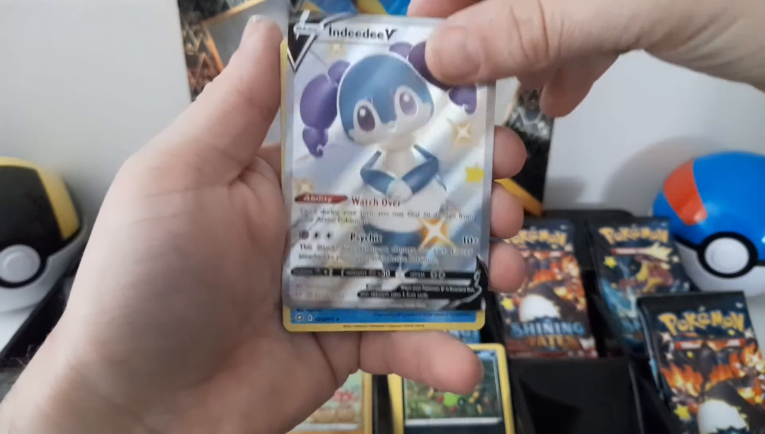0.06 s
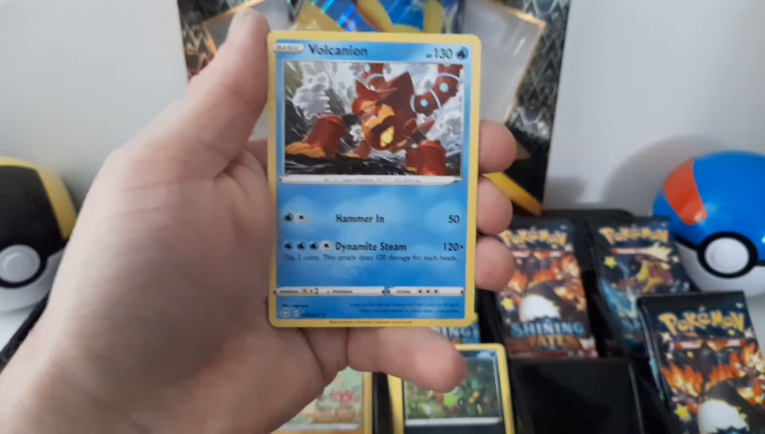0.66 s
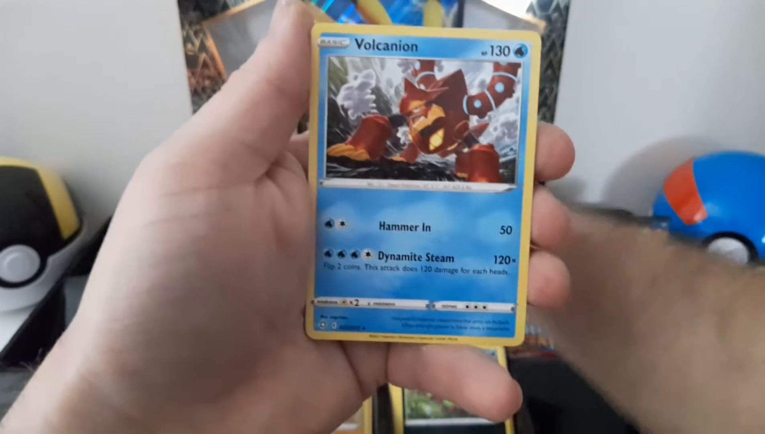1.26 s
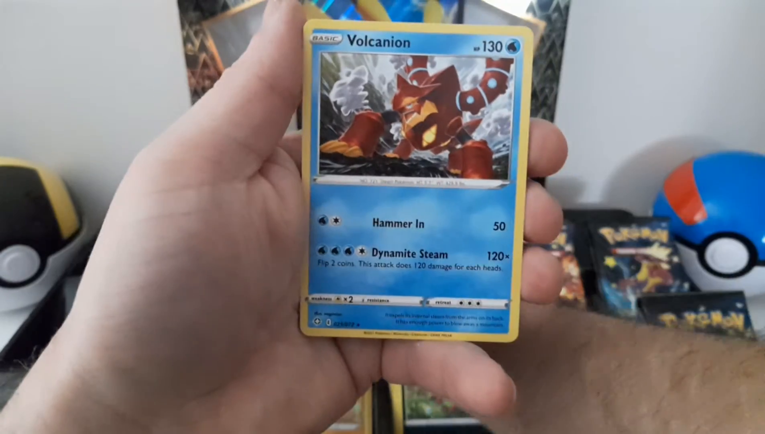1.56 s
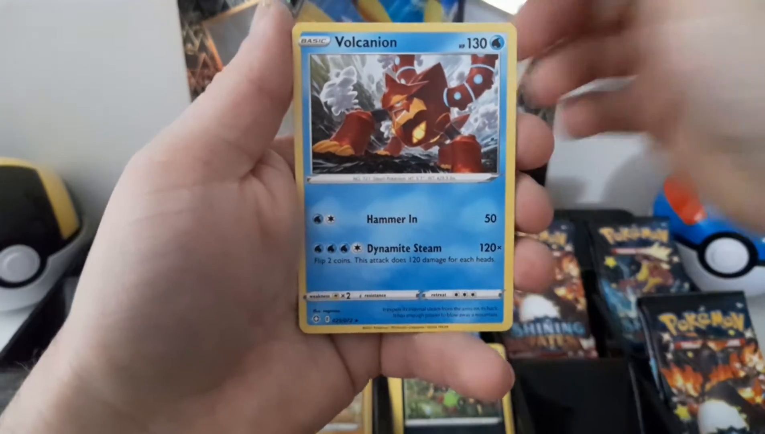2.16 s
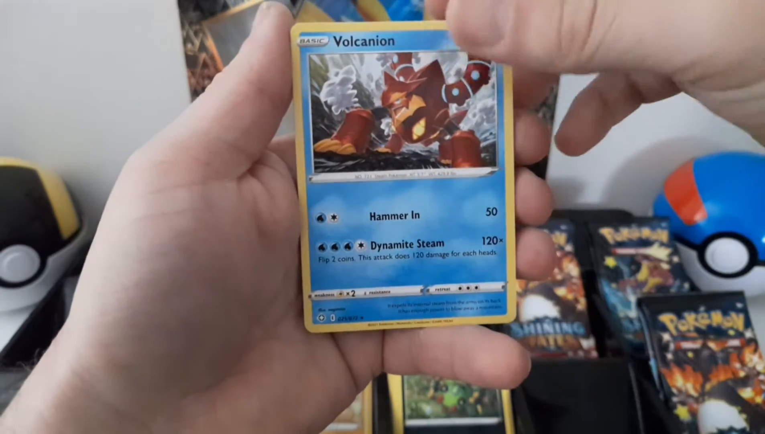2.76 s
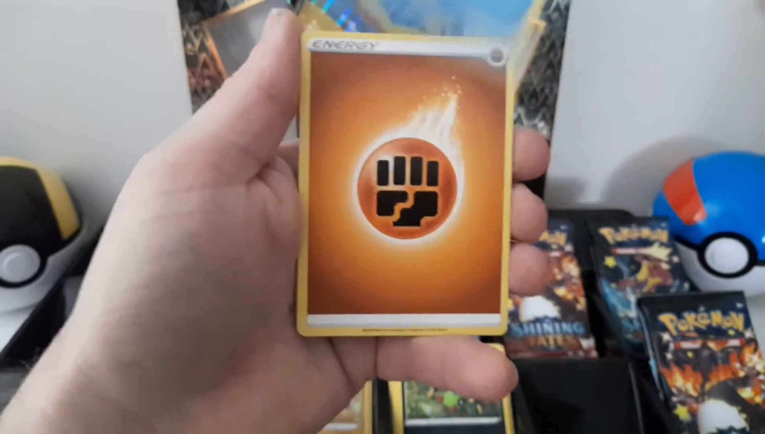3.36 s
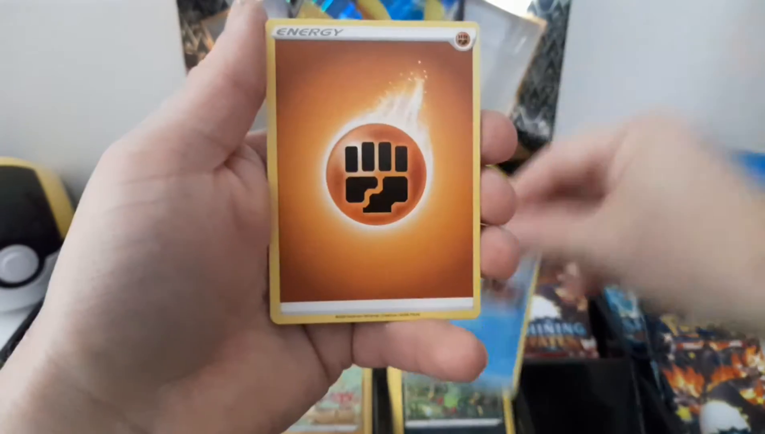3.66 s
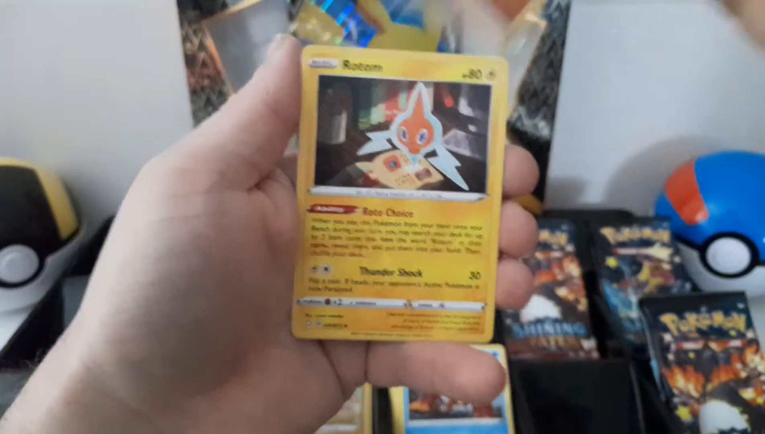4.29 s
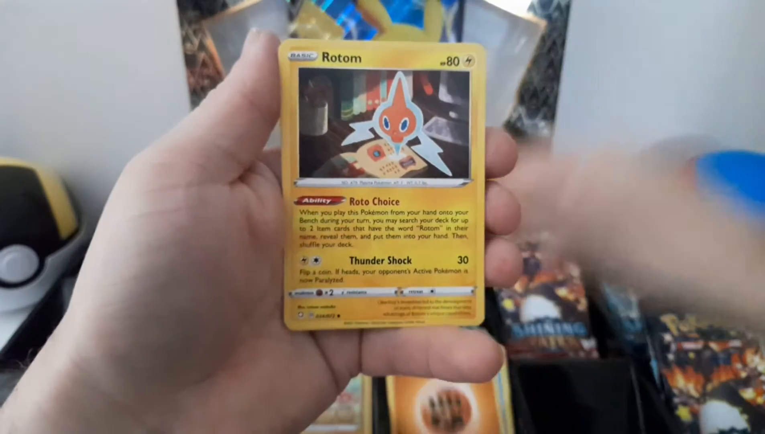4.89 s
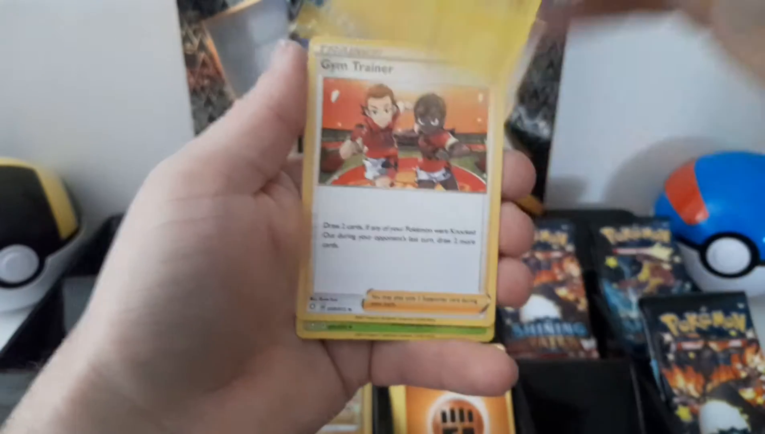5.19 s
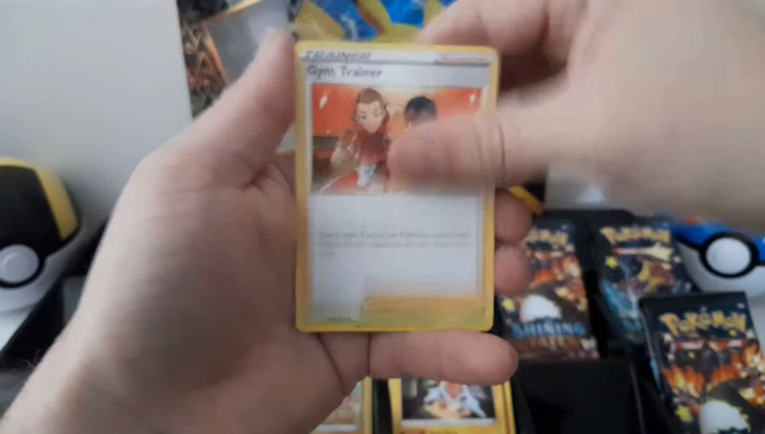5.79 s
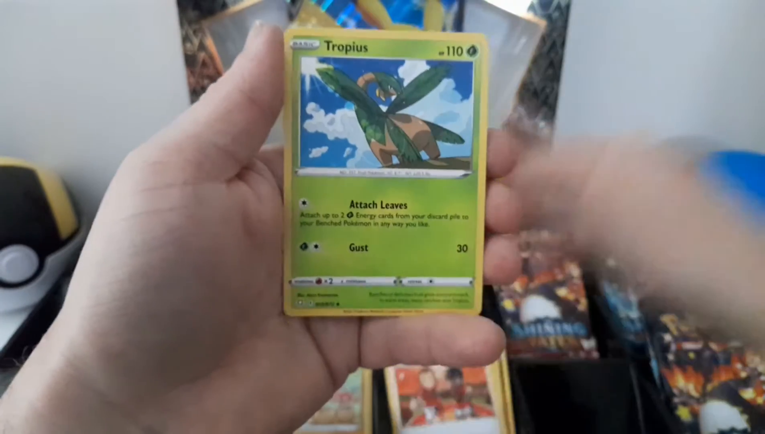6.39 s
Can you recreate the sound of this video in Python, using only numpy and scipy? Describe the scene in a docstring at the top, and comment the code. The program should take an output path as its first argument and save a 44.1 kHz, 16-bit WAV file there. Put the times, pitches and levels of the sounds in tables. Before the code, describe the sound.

Trading cards slide off a hand-held stack in short swishes and drop into a rattling plastic tray in a quiet room.

```python
"""A quiet room, close up: trading cards are slid one by one off a small hand-held stack.
Fingertips brush the stack; each card hisses over the next and its edge flicks free.
One card is laid on the table top; later ones drop on a pile in a hollow plastic tray,
which knocks and rattles. An appliance hums faintly."""
import sys
import numpy as np
from scipy import signal
from scipy.io import wavfile

SR = 44100
rng = np.random.default_rng(int(sys.argv[2]) if len(sys.argv) > 2 else 0)


def to_wav(sig):
    """Store sig (one row per channel, or 1-D mono) as 16-bit WAV at the path in sys.argv[1].

    Samples outside -1..1 are clipped; the rate is SR.
    """
    pcm = np.clip(np.atleast_2d(sig), -1, 1) * 32767
    pcm = np.round(pcm).astype(np.int16)
    wavfile.write(sys.argv[1], SR, pcm.T)  # frames by channels


N = 288678
TIME_S = np.arange(N) / SR

# Room noise spectrum. Each row: frequency in Hz, relative density in dB.
AIR_SPECTRUM = [(15, -48), (25, -45.5), (45, -9), (97, -3), (145, -8.5), (161, -13), (212, -17.5),
                (242, -16), (335, -6.5), (405, -13.5), (516, -14.5), (1260, -27), (1560, -30),
                (4370, -35.5), (16000, -37)]
# Appliance tones. Each row: frequency in Hz, level in dB.
HUM_TONES = [(134.6, -74.5), (333.8, -71.5), (371.4, -89.5), (570.6, -84)]
# Stereo likeness of noise. Each row: frequency in Hz, left-right correlation.
STEREO_CORRELATION = [(50, 0.22), (250, 0.55), (700, 0.23), (1400, 0), (3000, 0.2), (8000, 0),
                      (15000, 0.46)]
# Room echo. Each row: frequency in Hz, T60 in seconds, gain in dB.
ECHO_BANDS = [(151, 0.41, -8.5), (400, 0.23, -12.5), (990, 0.5, -20), (3000, 0.33, -15.5),
              (7000, 0.63, -20.5), (15000, 0.16, -8.5)]

# Friction spectra. Each row: frequency in Hz, relative density in dB.
RASP_SPECTRUM = [(120, 0), (300, 4), (600, -3), (1000, -0.5), (1400, -8), (2150, 3), (2900, -4),
                 (4200, -0.5), (5500, 2.5), (6800, -3.5), (8200, -13), (11000, 0), (16000, -40)]
HISS_SPECTRUM = [(3000, -25), (7000, 7.5), (9000, -18), (11500, 4.5), (14000, 8), (16000, -1.5)]
# Card-on-card strokes. Each row: start and length in seconds, then rasp, hiss and swell in dB.
STROKES = [(0.212, .26, -57, -59, 18.5), (1.711, 0.23, -68, -82, 4), (3.035, .16, -64.5, -61.5, 7.5),
           (3.223, 0.047, -65, -72, 5), (3.278, .13, -53, -52, 5), (3.829, 0.13, -65, -77, -6.5),
           (3.955, 0.017, -41.5, -45, 12), (4.003, .18, -71, -76, 0), (4.198, 0.12, -51.5, -46, 8),
           (4.634, 0.074, -42, -47.5, 18), (5.089, 0.051, -59, -58.5, -4), (5.143, 0.096, -51, -47, 5.5),
           (5.541, 0.083, -62, -58.5, -0.5), (5.83, .12, -41.5, -39, 15.5), (5.965, 0.046, -59, -82.5, 2),
           (6.04, .11, -72.5, -70.5, 1.5), (6.274, 0.043, -46.5, -52, 0.5)]

# Resonances. Each row: frequency in Hz, relative level in dB, T60 in seconds.
CARD_MODES = [(239, 4, 0.046), (312.4, 7, 0.073), (415, -27, 0.065), (580, -15, 0.01), (944, 12, 0.015),
              (1030, -14, 0.022), (1680, -2.5, 0.033), (2320, -11, 0.03)]
TABLE_MODES = [(259, 4, 0.081), (314.4, 2, 0.12), (384, -5, 0.13), (547, -13, 0.15), (619, -9.5, 0.13),
               (778, -3.5, 0.062), (963, -2.5, 0.025), (1134, -2, 0.047), (1720, -28, 0.023),
               (2240, 8.5, 0.027)]
TRAY_MODES = [(265, -9, 0.11), (303, -2.5, 0.11), (335, 0.5, 0.082), (350, -2, 0.043), (427, -1, 0.085),
              (528.3, -4.5, .1), (637, -11, 0.088), (750, -6.5, 0.055), (860, -3, 0.048),
              (1024, -0.5, 0.053), (1101, -7, 0.079), (1256, -4.5, 0.026), (1392, 3.5, 0.028),
              (1512, -4.5, 0.051), (2070, -5, 0.03), (2730, -4, 0.018), (2960, 0, .018), (3680, -1, .014),
              (5200, -5, 0.011), (6100, -7, .012)]
# Thump, body, clack and tick ranges of a contact. Each row: low and high edge in Hz.
RANGES_HZ = [(215, 600), (600, 2000), (2000, 6900), (6900, 17000)]
# Gain in dB that full hardness adds to each of those ranges.
HARDNESS_DB = (1.5, -1.5, 13.5, 17)
# Contacts. Each row: start in seconds, base level in dB, hardness from 0 to 1, extra thump in dB.
FINGER_HITS = [(2.6381, -72.5, 0.1, 1), (3.5733, -76.5, 0.74, 8), (3.8241, -63.5, 0.06, -3),
               (3.9182, -66.5, 0.9, -3), (3.9464, -58, 0.87, -1), (4.1921, -56, .4, 1),
               (4.8596, -67, 0.87, 0), (5.8182, -45.5, 0, 0), (6.2575, -63, 0.72, 5),
               (6.3701, -61.5, 1.0, -12)]
EDGE_HITS = [(3.3259, -62, 1, 7), (3.4101, -62.5, 0.1, 10.5), (4.3166, -51.5, 0.3, -4),
             (4.3318, -44, 0.63, -2), (5.2618, -39.5, 0, -2.5), (5.952, -37.5, 0.73, 4)]
TABLE_HITS = [(1.482, -58, 0.94, 3.5), (1.5112, -63, 0.6, -1), (1.6982, -52, 0.16, -4),
              (1.7779, -63, 0.6, -4), (1.854, -37, 0.73, -2), (1.9123, -45, 0.33, -4),
              (1.9381, -48.5, 0.05, 3), (1.9727, -53, 0, 0)]
TRAY_HITS = [(3.9745, -33.5, 0.84, 1.5), (4.0376, -44.5, 0.3, 4.5), (4.0659, -49, 0.1, -2),
             (4.0883, -40, 0.74, 2.5), (4.1168, -48.5, .1, 4.5), (4.1415, -45.5, .4, 1),
             (4.5646, -31.5, 1.0, -1.5), (4.6305, -46.5, 0.98, -2.5), (4.6704, -35, 0.43, -5.5),
             (4.7508, -52.5, 0.6, -15), (4.9285, -29, 0.76, 0), (4.96, -44, 0, -9), (5.0096, -41, 0, -2),
             (5.0555, -40, 0.9, 6.5), (5.0706, -40, 0.65, -0.5), (5.0827, -49.5, 0, 18.5),
             (5.11, -28, 0, -5.5), (5.6287, -27, 0.92, 1), (5.701, -36, 0.24, 0), (5.751, -43, 0.5, 2),
             (5.7824, -47, 0.17, -2), (6.3892, -30, 0.68, 2), (6.4186, -48, 0.8, -11),
             (6.4492, -49.5, 0.5, 6), (6.4981, -35, 0, -2), (6.5244, -50.5, 0.66, 3)]


def from_db(db):
    """Decibels to gain."""
    return 10 ** (np.asarray(db) / 20)


def unit_rms(x):
    """Scale to unit power."""
    return x / np.sqrt(np.mean(x ** 2) + 1e-20)


def at_hz(table, hz, column=1):
    """Interpolate a column over log frequency."""
    columns = np.transpose(table)
    return np.interp(np.log(hz), np.log(columns[0]), columns[column])


def bandpass(x, low_hz, high_hz, order=2):
    """Causal Butterworth band-pass."""
    return signal.sosfilt(signal.butter(order, [low_hz, high_hz], "band", fs=SR, output="sos"), x)


def drift(rate_hz):
    """Random ramps, unit RMS."""
    knots = rng.standard_normal(N // 10)
    return unit_rms(np.interp(TIME_S * rate_hz, np.arange(len(knots)), knots))


def add(out, start_s, sound):
    """Mix in a short stereo sound."""
    start = int(start_s * SR)
    out[:, start:start + sound.shape[1]] += sound[:, :N - start]


def pan(x, left_db):
    """Stereo balance, left minus right."""
    return x * from_db([[left_db / 2], [-left_db / 2]])


def noise_bands(size):
    """Yield centre in Hz and partly correlated stereo noise for each narrow band."""
    edges_hz = np.geomspace(25, 17500, 27)
    white = rng.standard_normal((2, 2, size))
    for k, (low_hz, high_hz) in enumerate(zip(edges_hz, edges_hz[1:])):
        mid, side = bandpass(white[k % 2], low_hz, high_hz)
        hz = np.sqrt(low_hz * high_hz)
        alike = np.clip(at_hz(STEREO_CORRELATION, hz), -1, 1)
        yield hz, np.sqrt(1 + alike) * mid + np.sqrt(1 - alike) * side * [[1], [-1]]


def coloured_noise(spectrum, waver_db):
    """Stereo noise, unit RMS; each band swells and fades on its own."""
    return unit_rms(sum(from_db(at_hz(spectrum, hz) + waver_db * drift(22)) * noise
                        for hz, noise in noise_bands(N)))


def room_air():
    """Soft, bass-heavy room noise."""
    return from_db(-66) * coloured_noise(AIR_SPECTRUM, waver_db=3)


def appliance_hum(waver_rad=0.97):
    """Low tones with wavering phase."""
    return sum(from_db(db) * np.sqrt(2) * np.sin(2 * np.pi * hz * TIME_S + waver_rad * drift(8.7))
               for hz, db in HUM_TONES)


def room_echo(x, onset_s=0.0029):
    """Diffuse echo, decaying band by band."""
    t, response = TIME_S[:SR // 2], 0
    for hz, noise in noise_bands(len(t)):
        decay = from_db(-60 * t / at_hz(ECHO_BANDS, hz)) * (1 - np.exp(-(t / onset_s) ** 2))
        gain = from_db(at_hz(ECHO_BANDS, hz, column=2))
        response = response + gain * noise * decay / np.sqrt(2 * np.sum(decay ** 2))
    return signal.fftconvolve(x, response, axes=1)[:, :N]


def contacts(hits, modes, *, rise_s, detune, soft_db, crack_db, crack_t60_s, flutter_db, flutter_t60_s,
             rattle_db, rattle_t60_s, thud_db, thud_t60_s):
    """Modal ring, crack, card flutter, rattle and thud; soft_db: range gains at zero hardness."""
    out, t = np.zeros((2, N)), TIME_S[:SR // 5]
    rest_hz, mode_db, t60_s = np.transpose(modes)[:, :, None]
    shortness = np.minimum(rest_hz / 1000, 3)
    ring_envelope = from_db(mode_db - 60 * t / t60_s) * (1 - np.exp(-t / rise_s))
    crack = from_db(crack_db - 60 * t / crack_t60_s)
    flutter = from_db(flutter_db - 60 * t / flutter_t60_s)
    for start_s, level_db, hardness, thump_db in hits:
        # The contact point sets each mode's strength and sign, and shifts the upper ones.
        strength = from_db(4 * rng.standard_normal(rest_hz.shape)) * rng.choice([-1, 1], rest_hz.shape)
        hz = rest_hz * (1 + detune * shortness * rng.standard_normal(rest_hz.shape))
        # Short waves reach the two microphone ports out of step.
        phase_rad = 0.49 * shortness * rng.standard_normal((2,) + hz.shape)
        ring = np.sum(strength * ring_envelope * np.sin(2 * np.pi * hz * t + phase_rad), axis=1)
        hit = ring + rng.standard_normal((2, len(t))) * (crack + flutter)
        # Loose cards chatter: about 300 fading touches a second.
        touches = (rng.random(len(t)) < 300 / SR) * rng.uniform(-1, 1, len(t)) * (t > 0.012)
        rattle = bandpass(touches * from_db(rattle_db - 60 * t / rattle_t60_s), 500, 3500, order=1)
        hit = hit + signal.fftconvolve(hit, rattle[None], axes=1)[:, :len(t)]
        # Harder is brighter; a flat, heavy landing thumps more.
        colour_db = np.array(soft_db) + hardness * np.array(HARDNESS_DB) + [thump_db, 0, 0, 0]
        for edges_hz, range_db in zip(RANGES_HZ, colour_db):
            part = bandpass(hit, *edges_hz, order=4)
            power = np.sum(part ** 2) / 2 / (0.015 * SR)  # energy spread over 15 ms
            add(out, start_s, from_db(level_db + range_db) * part / np.sqrt(power))
        # A soft low thud follows the thump.
        thud = unit_rms(bandpass(rng.standard_normal(len(t)), 58, 160)) * from_db(-60 * t / thud_t60_s)
        add(out, start_s, from_db(level_db + thump_db + thud_db) * np.array([thud, thud]))
    return out


def finger_brushes():
    """Fingertips graze the stack: faint, noisy contacts."""
    return contacts(FINGER_HITS, CARD_MODES, rise_s=0.0018, detune=0.02, soft_db=(1.5, -6.5, -5, -10.5),
                    crack_db=12, crack_t60_s=0.082, flutter_db=2, flutter_t60_s=0.13,
                    rattle_db=-21, rattle_t60_s=0.1, thud_db=-11, thud_t60_s=0.2)


def edge_flicks():
    """A bent card springs free of the stack and rings briefly."""
    return contacts(EDGE_HITS, CARD_MODES, rise_s=0.00035, detune=0.018, soft_db=(-1.1, -3, -10.5, -37),
                    crack_db=12.5, crack_t60_s=0.012, flutter_db=-5, flutter_t60_s=0.11,
                    rattle_db=-10, rattle_t60_s=0.13, thud_db=-7, thud_t60_s=0.2)


def table_taps():
    """A card, laid down, excites the table top."""
    return contacts(TABLE_HITS, TABLE_MODES, rise_s=0.002, detune=0.027, soft_db=(1.8, -3, -23.5, -36.5),
                    crack_db=5, crack_t60_s=0.077, flutter_db=0, flutter_t60_s=0.22,
                    rattle_db=-10.5, rattle_t60_s=0.19, thud_db=-15, thud_t60_s=0.38)


def tray_knocks():
    """Cards land on the pile and rebound; the hollow tray rings."""
    return contacts(TRAY_HITS, TRAY_MODES, rise_s=0.0013, detune=0.021,
                    soft_db=(-0.43, -0.12, -15, -32.5),
                    crack_db=8.5, crack_t60_s=0.012, flutter_db=0.5, flutter_t60_s=0.11,
                    rattle_db=-12, rattle_t60_s=0.3, thud_db=-18.5, thud_t60_s=0.49)


def card_slides(grip_s=0.012, release_db_per_s=649, hiss_lead_s=0.01,
                flare_db=4, flare_lead_s=0.02, flare_width_s=0.0088):
    """Card stock rubs in tiny catches, louder with speed; the hiss flares just before the card leaves."""
    rasp, hiss = np.zeros((2, N))
    for start_s, length_s, rasp_db, hiss_db, swell_db in STROKES:
        t = TIME_S - start_s
        past_end_s = t - length_s
        speed = np.clip(t / grip_s, 0, 1) * from_db(-swell_db * np.clip(1 - t / length_s, 0, 1) ** 2)
        flared_db = hiss_db + flare_db * np.exp(-((past_end_s + flare_lead_s) / flare_width_s) ** 2)
        rasp += speed * from_db(rasp_db - release_db_per_s * np.clip(past_end_s, 0, 1))
        hiss += speed * from_db(flared_db - release_db_per_s * np.clip(past_end_s + hiss_lead_s, 0, 1))
    grain_db, judder_db = -0.5 * drift(1400), 1.6 * drift(90)
    # Wavering bands stand for resonances shifting as the overlap shrinks.
    rasp = rasp * coloured_noise(RASP_SPECTRUM, waver_db=2.8)
    hiss = hiss * coloured_noise(HISS_SPECTRUM, waver_db=1)
    return from_db(grain_db + judder_db) * (rasp + hiss)


def scene():
    """Cards slightly to the right, their echo, hum and room noise."""
    cards = pan(table_taps(), left_db=-3.6) + pan(tray_knocks(), left_db=-2.54)
    cards += pan(edge_flicks() + finger_brushes(), left_db=-2.8)
    cards += pan(card_slides(), left_db=-0.28)
    return cards + room_echo(cards) + pan(appliance_hum() + room_air(), left_db=-0.91)


def record(dry):
    """Steep low-pass."""
    cutoff_hz = 16100
    return signal.sosfilt(signal.ellip(12, 0.1, 80, cutoff_hz, fs=SR, output="sos"), dry)


dry = scene()
out = record(dry)
to_wav(out)
```